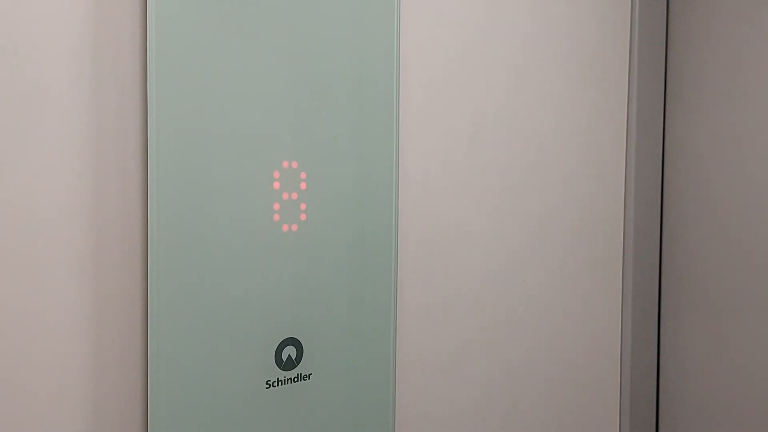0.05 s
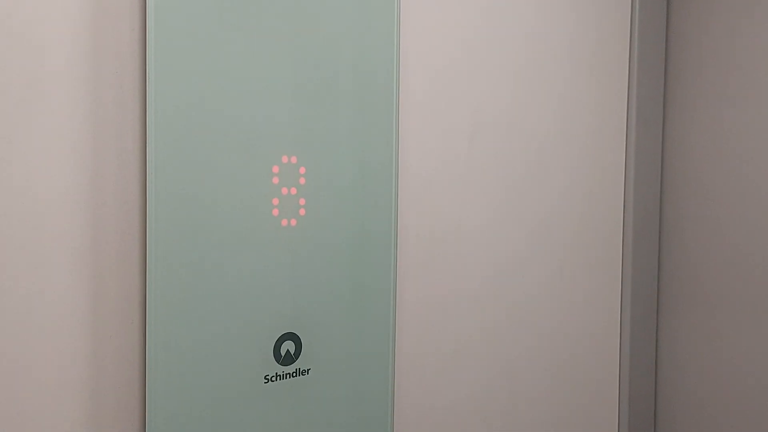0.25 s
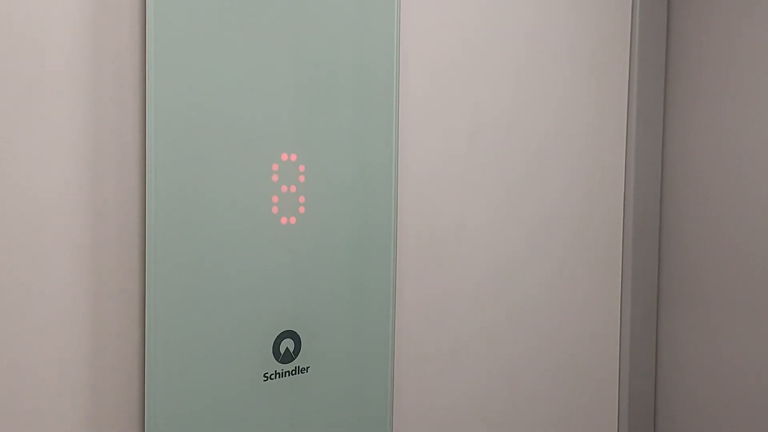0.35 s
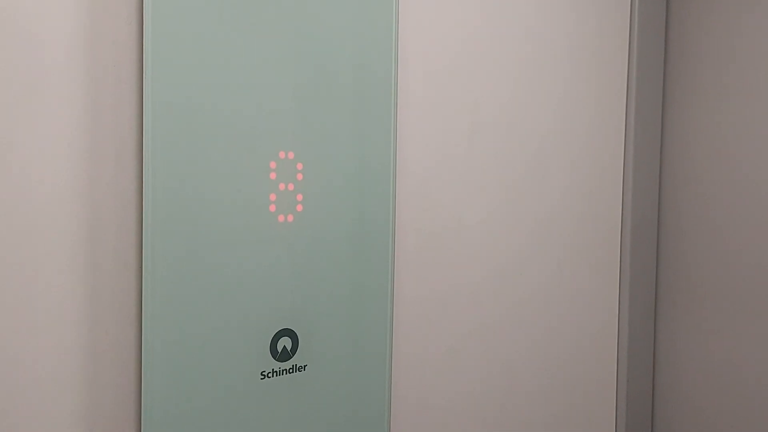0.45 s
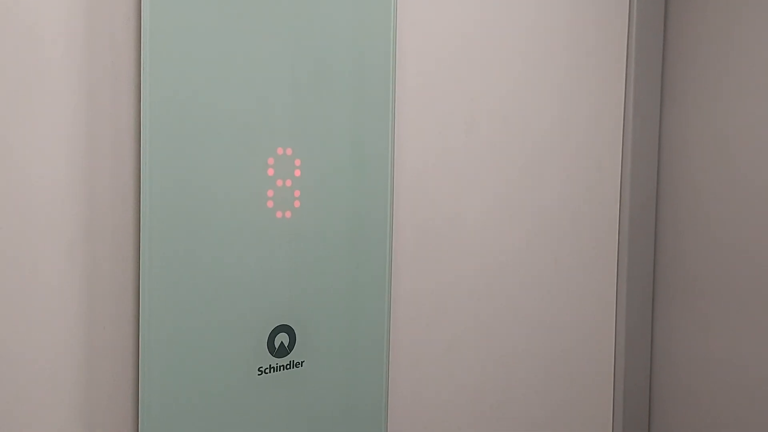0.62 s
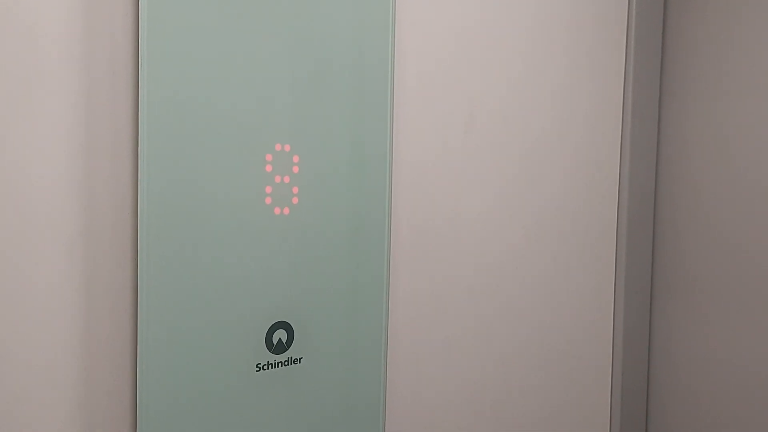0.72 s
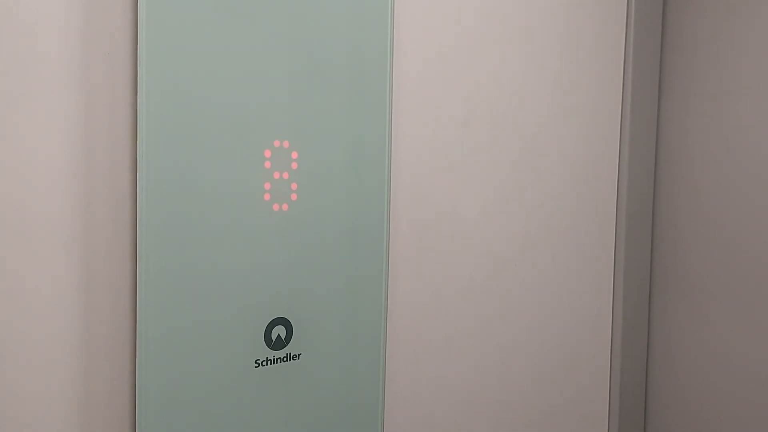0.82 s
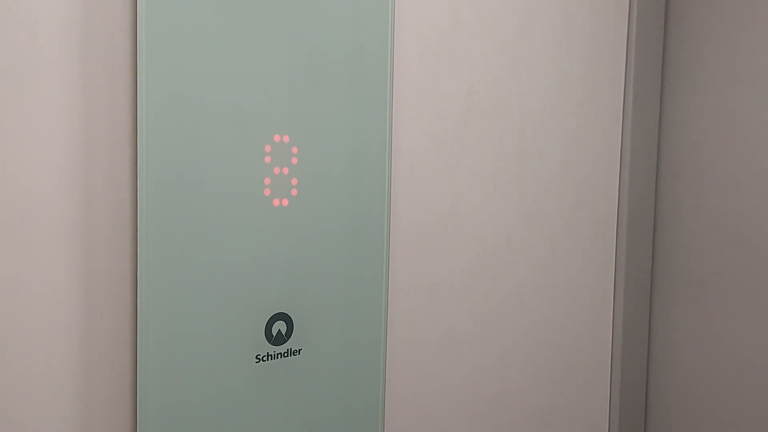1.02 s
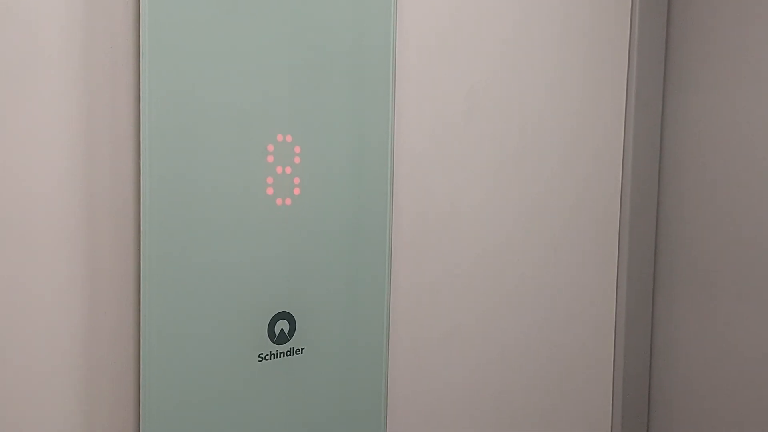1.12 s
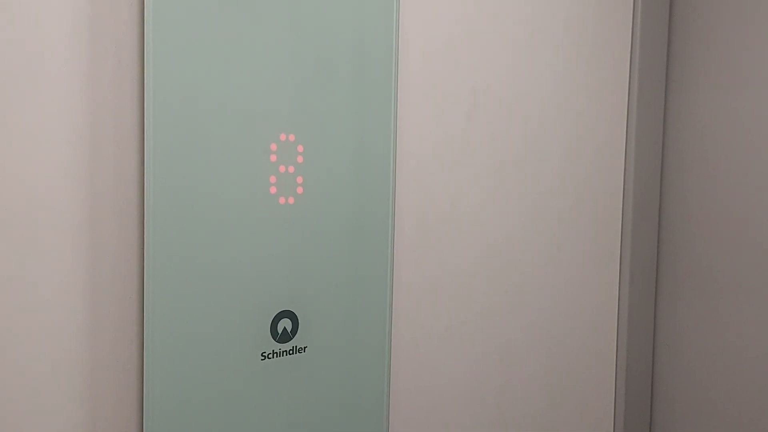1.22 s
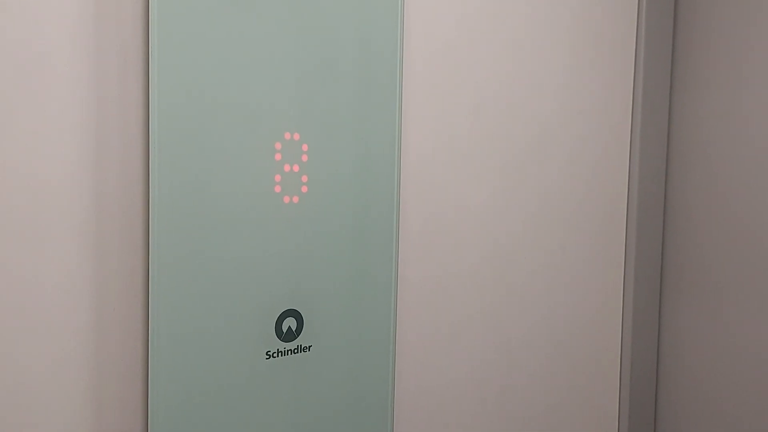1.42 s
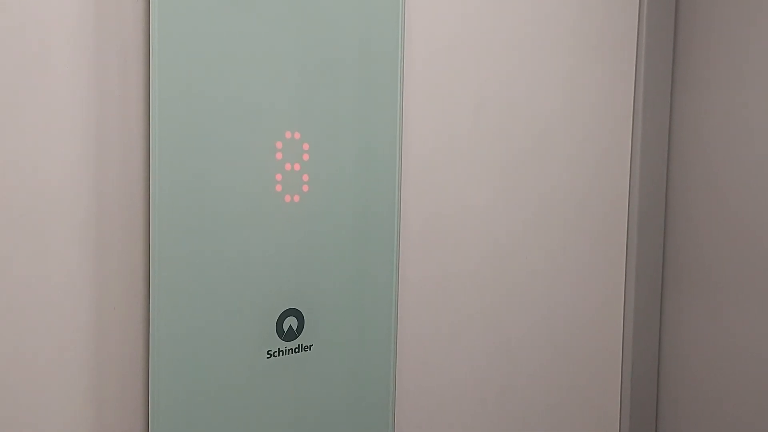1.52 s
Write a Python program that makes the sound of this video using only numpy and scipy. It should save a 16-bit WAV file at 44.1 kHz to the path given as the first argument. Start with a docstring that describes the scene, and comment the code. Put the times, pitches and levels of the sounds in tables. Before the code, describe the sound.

An elevator door clacks and thuds close by, inside a small steel car. Low panel thuds begin around 0.2 seconds, and sharp, briefly ringing latch clacks land at about 0.3, 0.5 and 0.6 seconds. A drive rumble and light roller rattle peak near 0.6 seconds. Softer ticks and thuds follow until about 1.2 seconds, then the rumble fades, leaving a steady low ventilation hum at 1.5 seconds.

```python
"""Inside a small steel lift car, a stereo microphone hears the door mechanism at close range. Latches and
levers clack and tick, the lock hook drops, and the door panels thud and shudder, making the car boom. Rollers
rattle in their track; every contact rings on between the hard walls. Underneath, the door drive rumbles and
dies down over the low hum of its motor and the ventilation's air."""
import sys
import numpy as np
from scipy import signal
from scipy.io import wavfile

SR = 44100
rng = np.random.default_rng(int(sys.argv[2]) if len(sys.argv) > 2 else 0)


def to_wav(s):
    """Save 16-bit WAV."""
    ch = np.atleast_2d(s).T  # columns
    pcm = np.round(np.clip(ch, -1, 1) * 32767)  # PCM
    wavfile.write(sys.argv[1], SR, pcm.astype(np.int16))


N = 68355
T = np.arange(N) / SR
DIRECT_DB = -18.5  # latches and rollers: the direct path against the sound off the walls


# metal contacts in the door: (time [s], level [dB], centre [Hz], width [octaves], rattle decay [s])
CLACKS = [(0.0, -32, 3020, 1.27, 0.043), (0.29, -32, 13900, 3.2, 0.044), (.328, -7.5, 1700, 0.6, 0.0049),
          (.329, -26, 7200, 1.4, 0.027), (0.345, -6.5, 2200, 0.31, 0.0054),
          (0.36, -18.5, 4580, 0.26, 0.022), (0.464, -10, 14300, 0.55, 0.039),
          (0.472, -11.5, 1300, 1.5, 0.038), (.476, -9, 796, 0.37, 0.021), (0.482, -17, 3500, 1, 0.049),
          (0.485, -16.5, 3240, 0.2, 0.005), (0.556, -27.5, 14200, 0.78, .005),
          (0.565, -9.5, 1650, 0.35, 0.02), (.566, -9.5, 3650, 0.17, 0.024),
          (0.752, -29, 7400, 0.52, 0.0087), (0.758, -23, 2350, 1.26, 0.037),
          (0.789, -29.5, 11400, 0.11, 0.015), (.864, -31.5, 4960, 0.86, 0.02),
          (0.998, -34.5, 4100, 0.19, .01), (1.116, -30, 2000, 0.69, 0.021), (1.16, -23, 1350, 0.79, 0.017),
          (1.169, -34.5, 8200, 2.3, 0.023)]
# ringing of the latch and its levers: (frequency [Hz], gain [dB], width [Hz])
LATCH_MODES = [(652, 14, 15), (671, 10.5, 42), (810, 11.5, 20), (1342, 3.5, 49), (1770, -17.5, 230),
               (3330, -11, 320), (6800, -4, 2700), (10300, -4, 110)]
def latches(car):
    """Metal contacts ring the latch; most of it reaches the microphone off the walls."""
    hits = sum(placed(from_db(db) * contact(hz, octaves, decay), s)
               for s, db, hz, octaves, decay in CLACKS)
    metal = hits + sum(from_db(db) * resonance(hits, hz, width) for hz, db, width in LATCH_MODES)
    return from_db(DIRECT_DB) * metal + through(metal, car)


def contact(centre_hz, octaves, decay_s, rattles_per_s=2800, size=8192):
    """Metal meets metal: a first touch and a dying rattle of tiny ones, in a bell-shaped band."""
    clicks = rng.choice([-1, 1], size) * (rng.random(size) < rattles_per_s / SR)
    clicks = clicks * np.exp(-T[:size] / decay_s)
    clicks[0] = 2.7  # the first touch is the hardest
    hz = np.linspace(0, SR / 2, 257)
    bell = np.exp(-.5 * (np.log2((hz + 1) / centre_hz) / octaves) ** 2)
    colour = signal.firwin2(129, hz, bell, fs=SR)
    return np.convolve(clicks / np.linalg.norm(clicks), colour)[32:]


# modes of the lock hook: (frequency [Hz], level [dB])
HOOK_MODES = [(499, -44), (632, -41.5), (777, -47), (1103, -56), (1843, -46.5), (1930, -61), (2385, -58),
              (4215, -63), (6810, -61)]
def hook(car, drop_s=.330, t60_s=.14, walls_db=-2):
    """The lock hook lands once and rings briefly, heard directly and off the walls."""
    landing = placed([1.], drop_s)
    knock = sum((-1) ** k * from_db(db) * ring(landing, hz, t60_s)
                for k, (hz, db) in enumerate(HOOK_MODES))
    return knock + from_db(walls_db) * through(knock, car)


# blows on the door panels: (time [s], level [dB], pitch [Hz])
THUDS = [(0.032, -44.5, 86.4), (.209, -34.5, 101.7), (0.211, -36, 180.6), (.241, -29, 84),
         (0.259, -36, 255), (0.297, -35, 122.2), (0.336, -27, 99.2), (0.388, -31, 128.8),
         (0.466, -30.5, 92.7), (0.474, -40.5, 225.3), (.515, -31.5, 209.2), (.518, -34, 282.7),
         (0.595, -32, 115.3), (0.601, -35, 272.5), (0.632, -29.5, 112), (.692, -27.5, 94),
         (0.743, -34.5, 68.5), (0.785, -36.5, 95.4), (.800, -43, 256), (0.841, -39.5, 82.6),
         (0.885, -36.5, 88.8), (0.935, -36, 85.2), (1.029, -61, 66), (1.086, -48, 111),
         (1.155, -42.5, 89.4), (1.197, -46.5, 77.3), (1.311, -54, 56)]
# boom of the panels and the car around the microphone: (frequency [Hz], gain [dB])
PANEL_MODES = [(45, 8.5), (93, -5.5), (114, -2), (141, -1), (187, -12.5), (240, -1), (254, -14), (338, 2),
               (475, 35.5)]
def doors(car, mode_width_hz=12, scatter_above_hz=183, scatter_db=-6):
    """Each blow swings a panel; its modes boom on and scatter round the car."""
    swings = [(hz, placed(from_db(db) * thud(hz), s)) for s, db, hz in THUDS]
    blows = sum(swing for _, swing in swings)
    modes = [(hz, from_db(db) * resonance(blows, hz, mode_width_hz)) for hz, db in PANEL_MODES]
    direct = sum(lean(hz) * part for hz, part in swings + modes)
    upper = highpass(sum(part for _, part in swings + modes), scatter_above_hz, order=2)
    return direct + from_db(scatter_db) * through(upper, car)


def thud(hz, swell_at_100_hz_s=.013):
    """A struck panel swings out for a few cycles and settles."""
    age = T / swell_at_100_hz_s * (hz / 100) ** .43  # higher thuds pass quicker
    return (age * np.exp(1 - age)) ** 2 * np.sin(2 * np.pi * hz * T)


# roller rattle at the microphone: (time [s], level [dB])
ROLLER_LEVEL = [(0, -74), (.17, -74.5), (.3, -66), (.6, -55), (.8, -67), (.9, -72), (1.02, -69.5),
                (1.2, -77.5), (1.4, -79.5)]
# modes of the door track: (frequency [Hz], relative gain [dB])
TRACK_MODES = [(1800, 1), (2105, 4.5), (2280, 1), (2450, -13.5)]
def rollers(car, ticks_per_s=700, spread_db=6.5, width_hz=330):
    """Uneven ticks of the rollers ring the door track."""
    ticks = (rng.random(N) < ticks_per_s / SR) * rng.choice([-1, 1], N)
    ticks = ticks * from_db(spread_db * rng.standard_normal(N))
    track = sum(from_db(db) * resonance(resonance(ticks, hz, width_hz), hz, width_hz)
                for hz, db in TRACK_MODES)
    return envelope(ROLLER_LEVEL) * rms_one(from_db(DIRECT_DB) * track + through(track, car))


# drive rumble and door hiss, heard from inside the car: (time [s], level [dB])
DRIVE_LEVEL = [(0, -47), (.18, -48), (.26, -39), (.44, -41), (.56, -34.5), (.72, -42.5), (.9, -46),
               (1.25, -50), (1.4, -58.5)]
HISS_LEVEL = [(0, -66), (.18, -80), (.27, -74.5), (.44, -59.5), (.7, -72.5), (.93, -75), (1.25, -77.5),
              (1.4, -83.5), (1.55, -87)]
# their spectra: (frequency [Hz], relative density [dB])
DRIVE_COLOUR = [(25, -36), (45, 9.5), (100, -6), (185, 2), (300, -4), (450, -12.5), (800, -16),
                (1200, -36.5), (2300, -32), (3300, -57.5), (15000, -53.5)]
HISS_COLOUR = [(1500, 5), (3500, 6.5), (5500, -3.5), (7500, 6.5), (10000, -28.5), (15000, 0.5)]
def drive():
    """The door drive rumbles and the sliding door hisses faintly; both swell and die down."""
    return envelope(DRIVE_LEVEL) * rush(DRIVE_COLOUR) + envelope(HISS_LEVEL) * rush(HISS_COLOUR)


# hum of the door motor in the background: (frequency [Hz], level [dB])
MOTOR_HUM = [(120, -63), (187, -66.5), (236, -60), (404, -65.5), (665, -75.5)]
# air from the ventilation: (frequency [Hz], relative density [dB])
AIR_COLOUR = [(25, -18), (60, 1), (150, -3), (250, -5), (400, 5), (750, -10), (1200, -15.5), (2500, -30),
              (4000, -61.5), (7500, -35), (15000, -41)]
def fan(waver=.66, air_db=-60.5):
    """The fan fills the car with steady air noise; the door motor adds a wavering hum."""
    hum = 0
    for hz, db in MOTOR_HUM:
        gain = from_db(db) * lean(hz) * (1 + waver * drift(6.8))
        hum += gain * np.sin(2 * np.pi * hz * T + drift(8.7))
    return hum + from_db(air_db) * rush(AIR_COLOUR)


# reverberation inside the car: (frequency [Hz], time to fall 60 dB [s])
CAR_T60 = [(100, 1), (600, 0.49), (2200, 0.37), (4500, 0.15), (8000, 0.1)]
def car_response(build_up_s=.00098):
    """Dense reflections off the close steel walls, dying band by band; energy 1."""
    tail = sum(band * from_db(-60 * T / at_hz(CAR_T60, hz)) for hz, band in noise_bands())
    return rms_one(tail * (1 - np.exp(-T / build_up_s))) / np.sqrt(N)


# balance at the microphone: (frequency [Hz], right over left [dB])
LEAN = [(60, 2), (125, 0), (250, 1.5), (600, 1), (2000, 2.5), (4000, 4), (8000, -2.5), (14000, 2)]
def lean(hz):
    """Left and right gains at a frequency."""
    return from_db(at_hz(LEAN, hz) * np.array([[-.5], [.5]]))


# likeness of the microphone's two sides: (frequency [Hz], correlation [-1 to 1])
LIKENESS = [(60, .985), (125, .93), (250, .62), (500, .55), (1000, -.05), (4000, -.05), (14000, .15)]
def noise_bands():
    """Third-octave bands of stereo noise of equal density: (centre [Hz], band)."""
    edges = 22 * 2 ** (np.arange(30) / 3)
    white = rng.standard_normal((2, 2, N + 8000))  # extra samples let the filters settle
    for k, (low, high) in enumerate(zip(edges, edges[1:])):
        bandpass = signal.butter(2, [low, high], "band", fs=SR, output="sos")
        mid, side = signal.sosfilt(bandpass, white[k % 2])[:, -N:]
        hz = np.sqrt(low * high)
        alike = at_hz(LIKENESS, hz)
        yield hz, lean(hz) * (np.sqrt(1 + alike) * mid + np.sqrt(1 - alike) * side * [[1], [-1]])


def rush(colour, flicker_db=1.0):
    """Coloured stereo noise whose bands flicker slightly; rms 1."""
    return rms_one(sum(band * from_db(at_hz(colour, hz) + flicker_db * drift(24.8))
                       for hz, band in noise_bands()))


def resonance(x, hz, width_hz):
    """Two-pole resonance with gain 1 at its peak."""
    r, w = np.exp(-np.pi * width_hz / SR), 2 * np.pi * hz / SR
    return signal.lfilter(np.array([1, 0, -1]) * (1 - r * r) / 2, [1, -2 * r * np.cos(w), r * r],
                          x + 1e-18)


def ring(x, hz, t60_s):
    """A unit click sets a sine of height 1 ringing."""
    r, w = from_db(-60 / (t60_s * SR)), 2 * np.pi * hz / SR
    return signal.lfilter([0, np.sin(w)], [1, -2 * r * np.cos(w), r * r], x + 1e-18)


def highpass(x, hz, order):
    """Roll off the bass."""
    return signal.sosfilt(signal.butter(order, hz, "high", fs=SR, output="sos"), x)


def through(x, response):
    """Play a mono sound through a stereo response."""
    return signal.fftconvolve(x[None], response, axes=1)[:, :N]


def placed(x, start_s):
    """A short sound set at its time."""
    return np.concatenate([np.zeros(int(start_s * SR)), x, np.zeros(N)])[:N]


def drift(rate_hz):
    """Slow random motion, spread about 1."""
    return np.interp(T * rate_hz, np.arange(400), rng.standard_normal(400))


def envelope(points):
    """Gain over time from (time [s], level [dB]) points."""
    return from_db(np.interp(T, *np.transpose(points)))


def at_hz(points, hz):
    """Read a table on a log-frequency axis."""
    frequencies, values = np.transpose(points)
    return np.interp(np.log(hz), np.log(frequencies), values)


def from_db(db):
    """Decibels to gain."""
    return 10 ** (np.asarray(db) / 20)


def rms_one(x):
    """Scale to rms 1."""
    return x / np.sqrt(np.mean(x ** 2) + 1e-20)


def scene():
    """Clacks, thuds, rollers, drive and fan, all heard from one spot in the car."""
    car = car_response()
    return latches(car) + hook(car) + doors(car) + rollers(car) + drive() + fan()


def record(dry, low_cut_hz=36, high_cut_hz=15800):
    """The microphone loses the deepest bass; the top is cut steeply."""
    lowpass = signal.ellip(12, .1, 80, high_cut_hz, fs=SR, output="sos")
    return signal.sosfilt(lowpass, highpass(dry, low_cut_hz, order=4))


dry = scene()
out = record(dry)
to_wav(out)
```